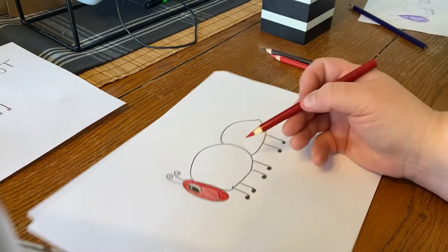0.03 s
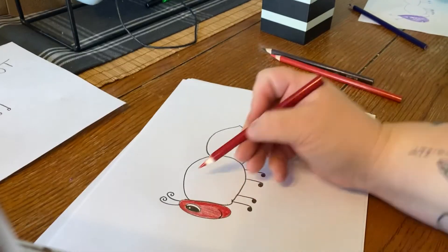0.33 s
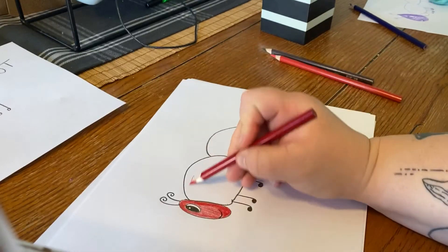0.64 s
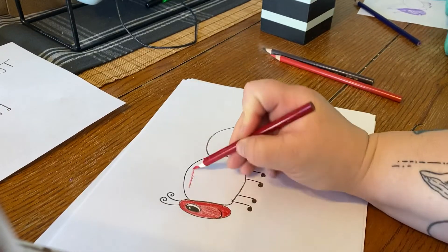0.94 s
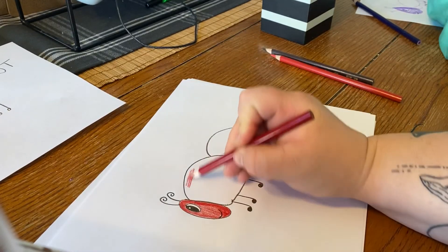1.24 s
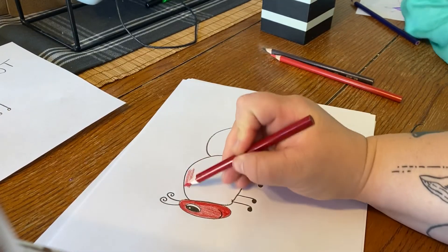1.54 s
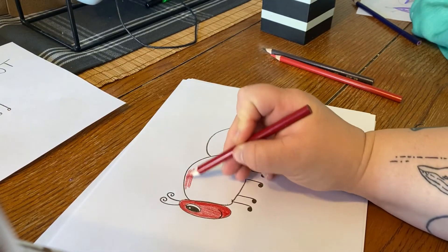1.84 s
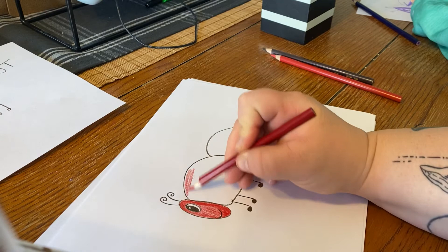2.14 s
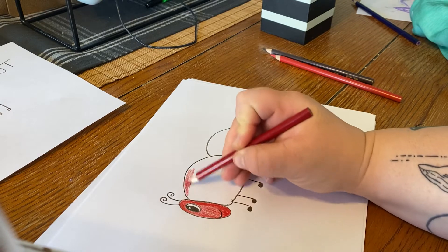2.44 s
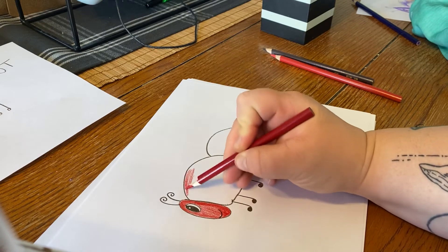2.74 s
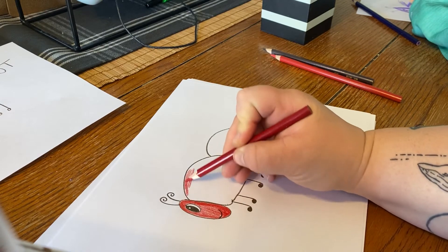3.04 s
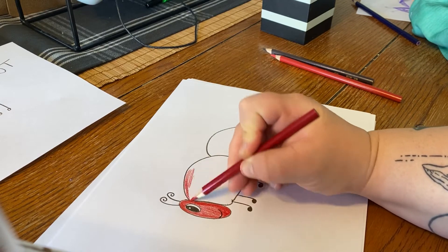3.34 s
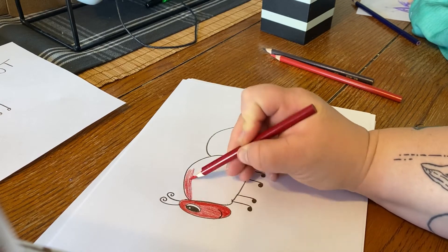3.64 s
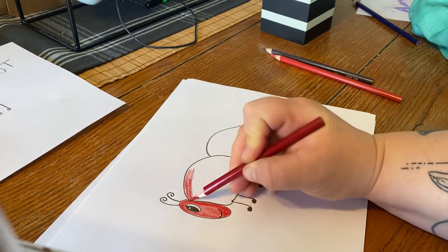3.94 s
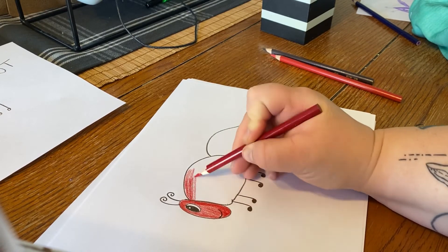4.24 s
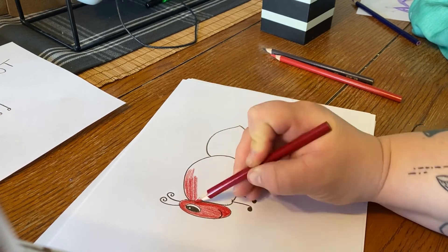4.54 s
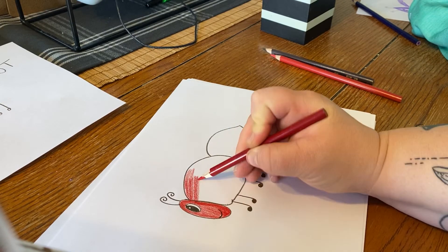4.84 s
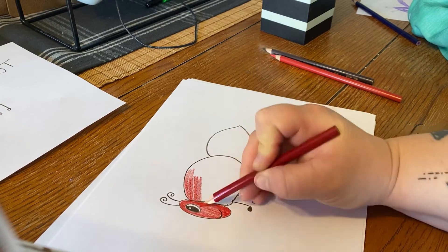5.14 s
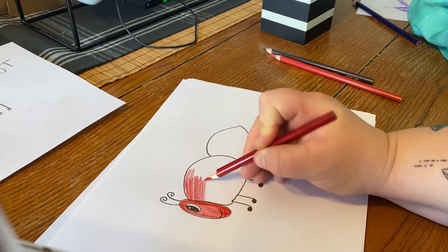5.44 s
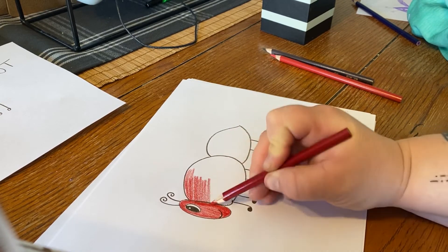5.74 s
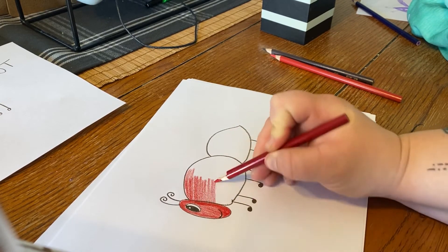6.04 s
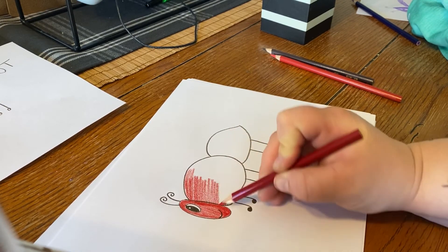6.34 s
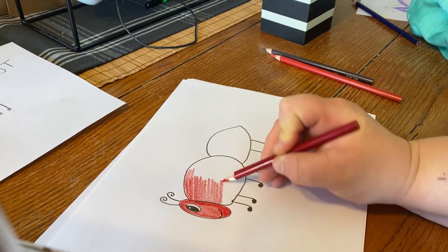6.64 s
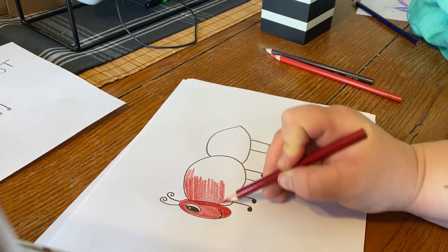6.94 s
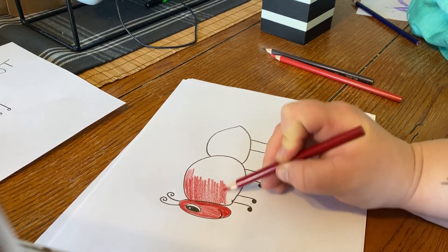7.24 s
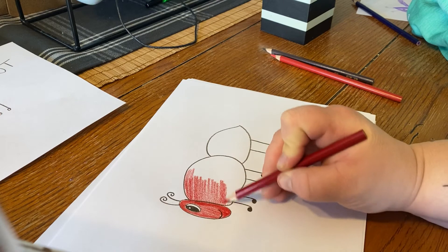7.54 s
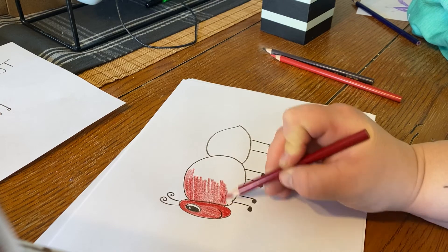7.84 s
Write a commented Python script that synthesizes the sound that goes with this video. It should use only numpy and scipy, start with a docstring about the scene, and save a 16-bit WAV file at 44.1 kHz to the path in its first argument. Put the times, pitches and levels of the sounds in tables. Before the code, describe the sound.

Close up in a quiet room, a brief swish of paper is broken by one dull thump and a dry pencil clack on a wooden table, by far the loudest sound. Soft, quick colored pencil scratching follows and runs on, a dry hiss and rasp in an even rhythm. A low, pulsing shake of the tabletop joins through the middle, and the strokes lighten briefly near the end.

```python
"""A thump and a clack, then quick scratchy shading: a coloured pencil, about ten strokes a second.
The hand lands on a wooden table and the pencil clacks down. Then the lead scrapes over the paper's
tiny bumps, the sheet rasps, the table top murmurs under it, and a judder with a rhythm of its own
shakes the wood. It is all heard from a phone close by, in a quiet room."""
import sys
import numpy as np
from scipy import signal
from scipy.fft import rfft, irfft, next_fast_len
from scipy.io import wavfile
from scipy.ndimage import uniform_filter1d

SR = 44100
rng = np.random.default_rng(int(sys.argv[2]) if len(sys.argv) > 2 else 0)


def transcribe(u):
    """Save the signal u as a 16-bit wav file named by the first command-line argument.

    u: samples, shape (n,) or (channels, n), limited to [-1, 1]; the rate is SR.
    q: integer samples, one column per channel.
    """
    v = np.clip(np.atleast_2d(u).T, -1, 1)
    q = np.round(v * 32767).astype(np.int16)
    wavfile.write(sys.argv[1], SR, q)


N = 356769
TIME = np.arange(N) / SR


def amp(db):
    """Turn decibels into a number to multiply by."""
    return 10 ** (np.asarray(db) / 20)


def unit(x):
    """Scale x to an average strength (rms) of 1."""
    return x / np.sqrt(np.mean(x ** 2))


def filtered(x, response):
    """Multiply each frequency in x by response(hz)."""
    size = next_fast_len(len(x) + 4096, True)
    return irfft(rfft(x, size) * response(np.fft.rfftfreq(size, 1 / SR)), size)[:len(x)]


def gains(points, hz):
    """Read gains off a table of (frequency [Hz], level [dB])."""
    points_hz, db = np.transpose(points)
    return amp(np.interp(np.log(hz + 1), np.log(points_hz), db))


def colour(x, points):
    """Shape the tone of x with such a table, at strength 1."""
    return unit(filtered(x, lambda hz: gains(points, hz)))


def bell(hz, centre_hz, octaves):
    """A gain that falls away on both sides of one pitch."""
    return np.exp(-.5 * (np.log2((hz + 1) / centre_hz) / octaves) ** 2)


def band(x, centre_hz, octaves):
    """Keep the part of x near one pitch, at strength 1."""
    return unit(filtered(x, lambda hz: bell(hz, centre_hz, octaves)))


def fade(t, t60):
    """Die away by 60 dB every t60 seconds."""
    return np.exp(-np.log(1000) * t / t60)


def swell(at, length):
    """A smooth rise and fall around a moment."""
    out = np.zeros(N)
    near = slice(max(int((at - 3 * length) * SR), 0), int((at + 3 * length) * SR))
    out[near] = np.exp(-2 * ((TIME[near] - at) / length) ** 2)
    return out


def walk(rate):
    """Drift to a new random value, rate times a second."""
    size = int(SR / rate)
    steps = np.repeat(rng.standard_normal(N // size + 1), size)
    return unit(uniform_filter1d(steps, size)[:N])


def add(out, at, x):
    """Mix x into out from a given time."""
    start = int(at * SR)
    out[start:start + len(x)] += x[:N - start]


def echoes(x, t60):
    """Many fading reflections, different on the left and right."""
    t = TIME[:SR // 2]
    tails = rng.standard_normal((2, len(t))) * fade(t, t60)
    return np.array([signal.fftconvolve(x, tail / np.linalg.norm(tail))[:N] for tail in tails])


def microphones(direct, scattered, scatter_db):
    """Direct sound reaches two microphones out of step; scattered sound differs between them."""
    # how much louder the left one is: (frequency [Hz], left minus right [dB])
    balance = [(100, -3.5), (400, -4.5), (1300, -1.5), (2600, -8.5), (3800, -4.5), (6000, -7.5),
               (7100, -4.5), (8500, 1), (16000, -0.5)]
    # how far ahead the left wave is: (frequency [Hz], phase lead [rad])
    phase_lead = [(50, 0), (600, -.9), (950, -4.2), (1700, -6.3), (2500, -7.3), (4000, -6.3), (5700, -7.8),
                  (7200, -6.5), (8800, -3.1), (11100, 0), (13500, 3.1), (15700, 6.3)]
    # sound bouncing off things on the table: (frequency [Hz], relative level [dB])
    scatter_tone = [(100, -12), (400, 1), (850, 15), (1650, -6), (3000, 8.5), (4300, -1.5), (6000, 6.5),
                    (8500, -43.5), (16000, -5)]
    ratio = lambda hz: gains(scatter_tone, hz) * amp(scatter_db)
    left = filtered(direct, lambda hz: np.exp(1j * np.interp(hz, *np.transpose(phase_lead))))
    out = []
    for side, straight, around in zip((1, -1), (left, direct), scattered):
        side_power = lambda hz: 2 / (1 + gains(balance, hz) ** (-2 * side))
        share = lambda hz: np.sqrt(side_power(hz) / (1 + ratio(hz) ** 2))
        out.append(filtered(straight + filtered(around, ratio), share))
    return np.array(out)


def room_tone(level_db=-71):
    """Quiet room air: both microphones share the bass, and each has its own faint hiss."""
    # the room's air and the microphones' hiss: (frequency [Hz], relative level [dB])
    air_tone = [(20, -29.5), (65, 0), (130, 1), (250, -10), (500, -19.5), (900, -25), (1500, -25.5),
                (3000, -37), (8000, -67), (16000, -39)]
    hiss_tone = [(300, 7), (1500, 5), (3000, -4), (13000, -9), (15500, 8)]
    air = colour(rng.standard_normal(N), air_tone)
    hiss = np.array([colour(rng.standard_normal(N), hiss_tone) for _ in range(2)])
    return amp(level_db + walk(2.5)) * air + amp(-86) * hiss


def rumble(speed):
    """The table top murmurs under the rubbing hand."""
    # weight of the hand on the table: (time [s], level [dB])
    lean = [(0.58, -55), (0.7, -59.5), (1.8, -57.5), (2.5, -62.5), (3.1, -58), (6.55, -58), (7.25, -66.5),
            (8.09, -60)]
    # the wood's murmur: (frequency [Hz], relative level [dB])
    wood_tone = [(20, -30), (40, -10.5), (65, 5), (105, -7), (133, -3.5), (165, -10), (300, -13),
                 (430, -17), (600, -20.5), (1200, -42)]
    lean_db = np.interp(TIME, *np.transpose(lean))
    return colour(rng.standard_normal(N), wood_tone) * (0.74 + 0.13 * speed) * amp(lean_db)


def paper_grit(rate, spread_db):
    """Paper fibres catch and let go: about rate clicks a second, of uneven size."""
    catches = rng.random(N) < rate / SR
    return catches * rng.standard_normal(N) * amp(spread_db * rng.standard_normal(N))


def hand_brushes():
    """The side of the hand whispers over the paper."""
    # each slide: (middle [s], length [s], level [dB], pitch [Hz], width [octaves])
    slides = [(0.05, 0.14, -63.5, 3530, 0.97), (0.281, 0.029, -61, 2880, 0.62),
              (.55, 0.72, -78, 4730, 0.24), (1.12, 0.14, -66, 3180, 0.33), (6.903, 0.083, -68, 1960, 0.87),
              (8.058, 0.076, -66.5, 552, 0.65)]
    grit = paper_grit(rate=8000, spread_db=2)
    return sum(amp(db) * swell(at, length) * band(grit, hz, octaves)
               for at, length, db, hz, octaves in slides)


def table_bumps(travel_s=0.0223, rise_s=0.0013):
    """Hand and pencil bump the table: the wood rings and the things on it rattle."""
    # each push: (time [s], peak [dB], pitch [Hz], width [octaves],
    # rattle against the peak [dB], rattle fade time [s])
    pushes = [(.166, -14, 99.6, 0.83, -43, 0.47), (.175, -37, 628, 0.4, -10.5, 0.088),
              (.184, -19, 255, 0.43, -33, .15), (.412, -45, 335, 0.73, -7, 0.36),
              (.428, -36, 97, 1.04, -10.5, 0.6), (1.695, -44, 472, 0.59, -8.5, 0.23),
              (5.247, -44, 147, 0.94, -7.5, 0.27), (6.438, -57, 204, 0.74, 1, 0.28)]
    # the notes of the table top: (frequency [Hz], relative level [dB], fade time [s])
    wood_notes = [(69.4, -9, 0.45), (77.4, 3, 0.46), (104, 3.5, 0.2), (130.7, 4, 0.12), (162, -5, .18),
                  (189, -7, 0.076), (230.6, -5, 0.13), (265, -4, 0.061), (333, -3.5, 0.055),
                  (413, 0.5, 0.053), (494, -15, 0.052), (521, -9, 0.071), (626, -16.5, 0.19)]
    # loose things rattling: (frequency [Hz], relative level [dB])
    rattle_tone = [(30, -10), (70, -8), (250, -3.5), (650, -7.5), (1000, -16), (3000, -32.5)]
    out, t = np.zeros(N), TIME[:SR]
    wood = sum(amp(db) * np.sin(2 * np.pi * hz * t) * fade(t, t60) for hz, db, t60 in wood_notes)
    # the wood bends in waves: 100 Hz takes travel_s to arrive, high notes less, so the pitch falls
    delay = lambda hz: travel_s * np.sqrt(100 / (hz + 1))
    wood = filtered(wood, lambda hz: np.exp(-4j * np.pi * hz * delay(hz)))
    soft_contact = 1 - np.exp(-(t / rise_s) ** 2)
    for at, db, centre_hz, octaves, rattle_db, rattle_t60 in pushes:
        ring = band(wood, centre_hz, octaves) * soft_contact
        add(out, at - delay(centre_hz), amp(db) * ring / np.abs(ring).max())
        rattle = band(colour(rng.standard_normal(SR), rattle_tone), centre_hz, octaves)
        add(out, at, amp(db + rattle_db) * rattle * fade(t, rattle_t60) * soft_contact)
    return out


def pencil_taps(crack_t60=0.0073):
    """The hard tip hits with a dry crack, then the shaft rings."""
    # each hit: (time [s], crack level [dB], ring level [dB])
    hits = [(0.172, -22.5, -18), (0.1787, -62, -33), (1.263, -49.5, -84), (1.6935, -59, -53),
            (1.712, -64, -54.5), (1.753, -55, -76), (6.903, -63, -59)]
    # the notes of the shaft: (frequency [Hz], relative level [dB], fade time [s])
    shaft_notes = [(1497, -17, 0.12), (1584, -3.5, 0.067), (1480, -34, 0.36), (1990, -29, 0.056),
                   (2150, -26, 0.029), (3210, -16, 0.02), (4190, -16.5, 0.0083)]
    # the tip's crack: (frequency [Hz], relative level [dB])
    crack_tone = [(300, -27), (1000, -63.5), (2500, 12.5), (4000, 14), (5500, 9.5), (8000, 7),
                  (15000, 10.5)]
    out, t = np.zeros(N), TIME[:SR // 2]
    ring = sum(amp(db) * np.sin(2 * np.pi * hz * t) * fade(t, t60) for hz, db, t60 in shaft_notes)
    for at, crack_db, ring_db in hits:
        crack = colour(rng.standard_normal(len(t)), crack_tone) * fade(t, crack_t60)
        add(out, at, amp(crack_db) * crack + amp(ring_db) * ring)
    return out


def judder(slip_hz=135, wander=.22, beat_s=0.036):
    """On each beat something rubbing sticks and slips unevenly, and each slip shakes the wood."""
    # runs of beats, a little slower than the strokes: (start [s], beats [count], rate [1/s])
    runs = [(1.853, 2, 9.6), (2.181, 17, 9.26), (4.136, 5, 9.2), (5.019, 8, 8.55)]
    # strength of the judder: (time [s], level [dB])
    strength = [(1.85, -58.5), (2.17, -59), (2.28, -51), (2.52, -58.5), (2.85, -60.5), (3.27, -63),
                (3.49, -54.5), (3.59, -61.5), (3.75, -56), (3.95, -62), (5.15, -61.5), (5.36, -55),
                (5.5, -59.5), (5.85, -64.5)]
    # the shaken wood: (frequency [Hz], relative level [dB])
    shake_tone = [(100, -23), (220, -15), (320, -5), (360, -4), (400, 3), (440, -3), (500, -13), (650, -18),
                  (1200, -40)]
    cycles = np.cumsum(slip_hz * np.exp(wander * walk(200))) / SR
    slips = np.diff(np.floor(cycles), prepend=0) * amp(2.9 * walk(300))
    beats = [first + k / rate for first, count, rate in runs for k in range(round(count))]
    force = amp(np.interp(beats, *np.transpose(strength)))
    return colour(slips, shake_tone) * sum(size * swell(at, beat_s) for at, size in zip(beats, force))


def stroke_motion(last_turn_s=8.16, loops_until_s=2.5, loop_speed=0.42):
    """The pencil goes back and forth: gives tip speed (0 to 1) and the levels of hiss and rasp."""
    # runs of even strokes, each lasting until the next: (start [s], strokes [count])
    runs = [(0.559, 14), (1.79, 7), (2.462, 3), (2.8, 15), (4.33, 6), (4.915, 7), (5.621, 15), (7.101, 6),
            (7.666, 5)]
    # pressure on the lead, as loudness: (time [s], level [dB])
    pressure = [(0.56, -69), (0.7, -61), (1.15, -60.5), (1.47, -63), (1.7, -67), (2.5, -68), (2.75, -71.5),
                (3.15, -66.5), (3.65, -62.5), (4.45, -58.5), (5.1, -57), (6.25, -58), (7.17, -64),
                (7.33, -79), (7.9, -67), (8.09, -66)]
    # swishes as hand and sheet settle: (middle [s], length [s], hiss level [dB], rasp level [dB])
    swishes = [(0.003, 0.39, -61, -66.5), (0.352, 0.093, -62.5, -78)]
    starts, counts = np.transpose(runs)
    progress = np.interp(TIME, np.append(starts, last_turn_s), np.append(0, np.cumsum(np.round(counts))))
    stroke = progress.astype(int)
    # the first strokes are small loops, so the tip keeps some speed at the turns
    sideways = loop_speed * (TIME < loops_until_s)
    speed = np.hypot(np.sin(np.pi * progress), sideways * np.cos(np.pi * progress))
    chance_db = 0.78 * rng.standard_normal(stroke.max() + 1)[stroke]
    pressure_db = np.interp(TIME, *np.transpose(pressure), left=-100) + chance_db
    direction = 1 - 2 * (stroke % 2)  # one way is louder, the way back softer
    hiss_db = pressure_db + 0.5 * direction
    rasp_db = -66 + 0.59 * (pressure_db + 60) + 1.4 * direction  # grows less with pressure
    for at, length, swish_hiss_db, swish_rasp_db in swishes:
        during = np.abs(TIME - at) < length / 2
        speed[during] = np.cos(np.pi * (TIME[during] - at) / length)
        hiss_db[during], rasp_db[during] = swish_hiss_db, swish_rasp_db
    return speed, uniform_filter1d(hiss_db, size=500), uniform_filter1d(rasp_db, size=500)


def pencil_scratch(speed, hiss_db, rasp_db):
    """The sheet rasps and the lead hisses with speed; a high fizz opens up as the lead slides freely."""
    # the sheet's rasp, the lead's hiss and its fizz: (frequency [Hz], relative level [dB])
    rasp_tone = [(250, -17), (450, -3), (700, -2), (950, -5), (1250, 1), (1700, 1), (2200, -6.5),
                 (3200, -13.5), (6000, -35.5)]
    hiss_tone = [(1500, -38.5), (2500, -9), (3600, -13), (4400, -0.5), (5000, -0.5), (6000, 2), (7000, -3),
                 (8000, -0.5), (10000, -1.5), (16000, -8.5)]
    fizz_tone = [(5000, -54), (7000, -9), (8500, -10.5), (11500, 4.5), (12300, -5), (13500, 6),
                 (15000, -1.5), (15700, 5.5)]
    # the heel of the hand drags on the sheet: (time [s], level [dB])
    drag = [(0.3, -65.5), (0.45, -70.5), (1.0, -69), (1.7, -72.5), (1.9, -68), (2.5, -69.5), (2.9, -79.5),
            (3.35, -73.5), (3.65, -68.5), (5.8, -68.5), (6.95, -74), (7.4, -84), (8.09, -74)]
    grit = paper_grit(rate=14000, spread_db=1.5) * amp(1.1 * walk(70))
    drag_db = np.interp(TIME, *np.transpose(drag))
    rasp = colour(grit, rasp_tone) * np.hypot(speed ** 1.54 * amp(rasp_db), amp(drag_db))
    rubbing = .2 + .8 * speed ** 1.6
    hiss = colour(grit, hiss_tone) * rubbing * amp(hiss_db - 4.5)
    sliding = np.sin(np.pi / 2 * speed) ** 3.8
    fizz = colour(grit, fizz_tone) * (0.1 + 0.73 * sliding) * amp(hiss_db - 3.0)
    # the finest sizzle depends less on pressure, so light strokes sound thinner
    sizzle_db = 0.28 * (hiss_db - hiss_db.max()) - 71.5
    sizzle = band(grit, centre_hz=15100, octaves=0.16) * sliding * amp(sizzle_db)
    return rasp + hiss + fizz + sizzle


def scene():
    """Rubbing and knocks, heard in stereo from the edge of the table."""
    speed, hiss_db, rasp_db = stroke_motion()
    # the tip keeps moving, so its reflections share the rhythm of the direct sound but not its grain
    direct, *scattered = (pencil_scratch(speed, hiss_db, rasp_db) + rumble(speed) + judder()
                          for _ in range(3))
    hand, taps, thumps = hand_brushes(), pencil_taps(), table_bumps()
    rubbing = microphones(direct + hand, scattered + echoes(hand, t60=0.09), scatter_db=-1.5)
    clacks = microphones(taps, echoes(taps, t60=0.0062), scatter_db=-11.5)
    # the furnished room returns the knocks without their treble
    dull_knocks = filtered(taps + thumps, lambda hz: bell(hz, centre_hz=700, octaves=2.8))
    room = amp(-13.0) * echoes(dull_knocks, t60=0.17)
    # thumps travel through the wood and shake both microphones alike
    return rubbing + clacks + thumps + room + room_tone()


def record(dry):
    """The phone cuts off the highest treble."""
    top_hz = 15850
    return signal.sosfilt(signal.ellip(12, .1, 80, top_hz, fs=SR, output="sos"), dry)


dry = scene()
out = record(dry)
transcribe(out)
```